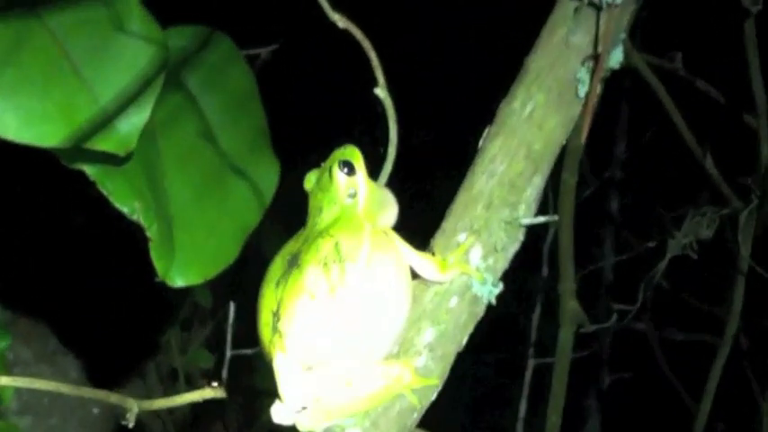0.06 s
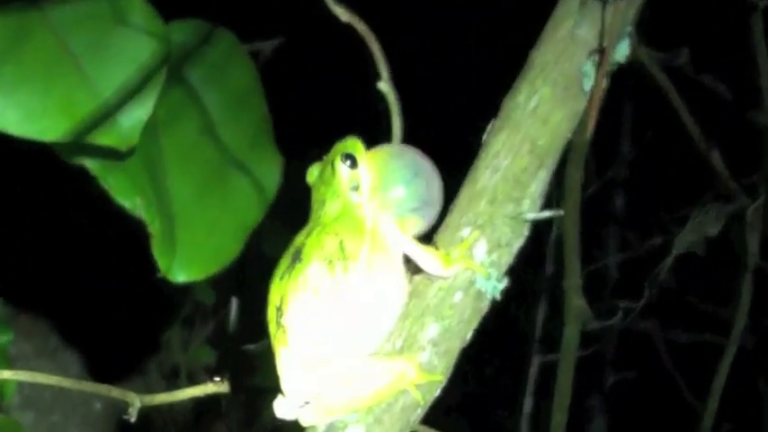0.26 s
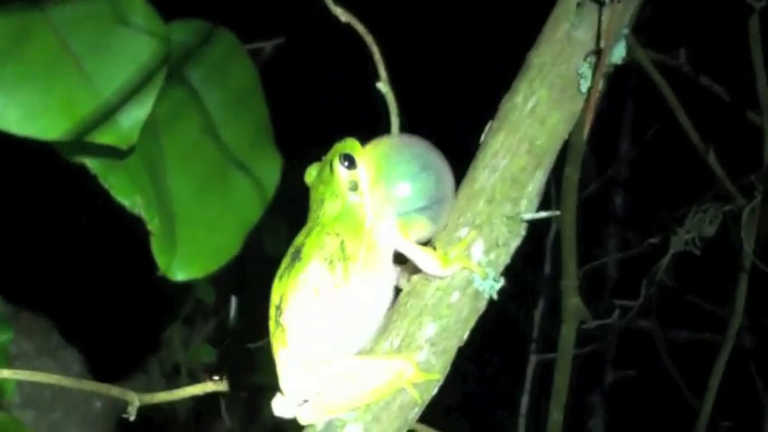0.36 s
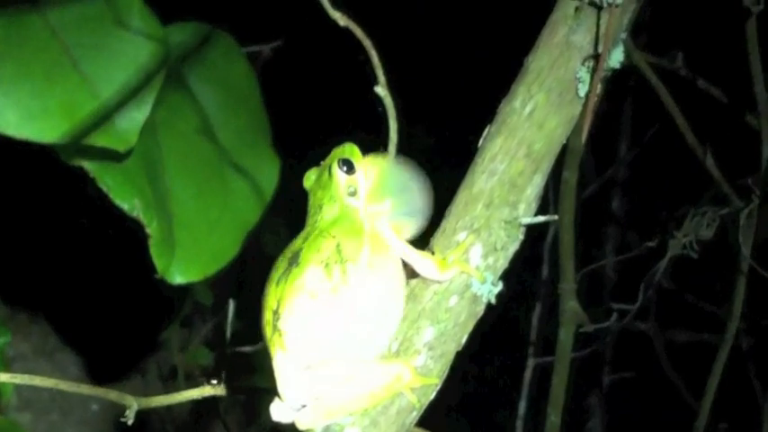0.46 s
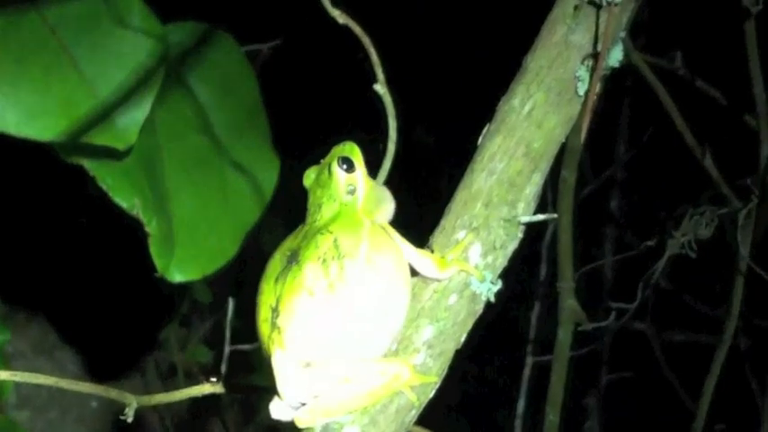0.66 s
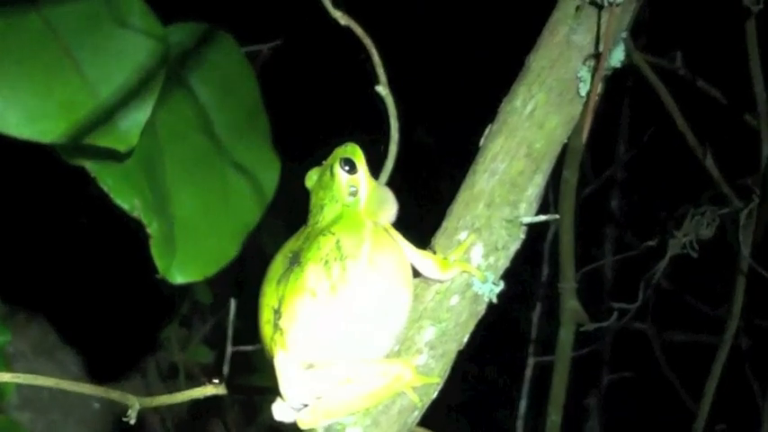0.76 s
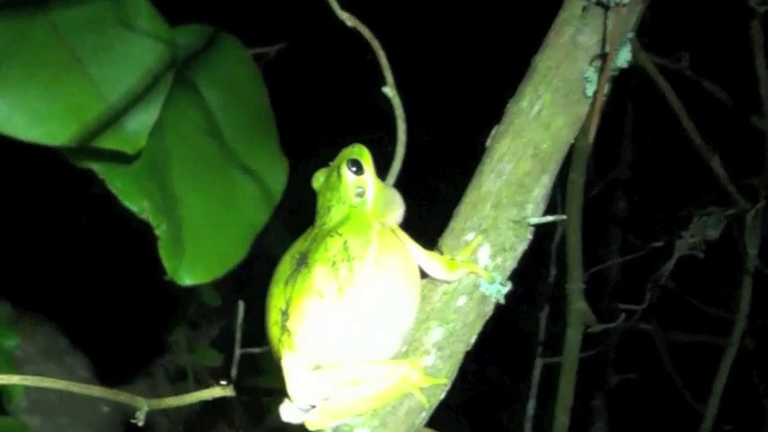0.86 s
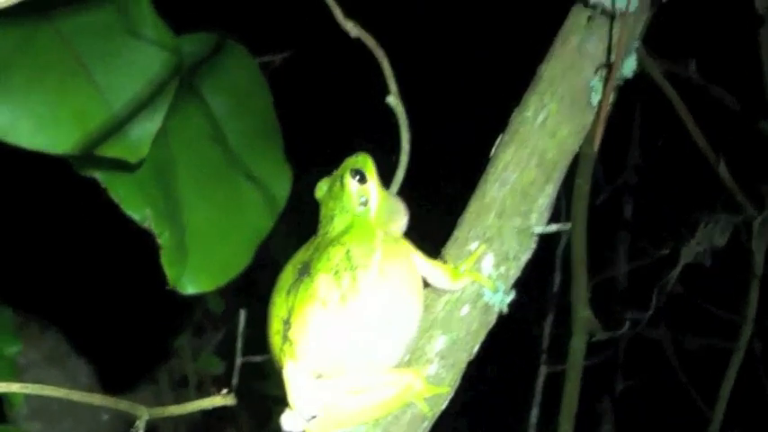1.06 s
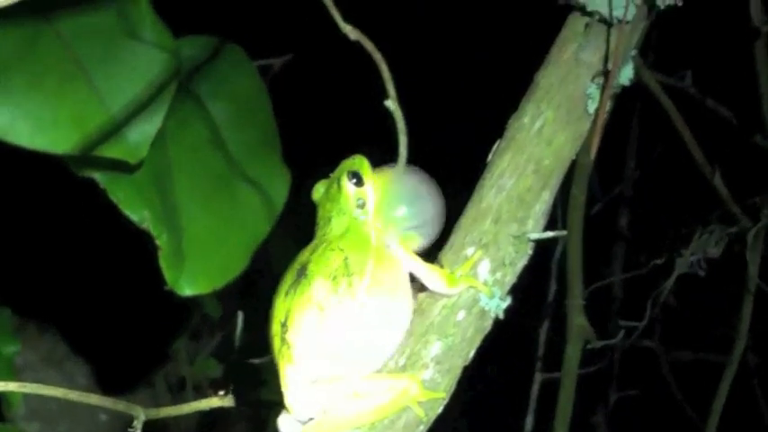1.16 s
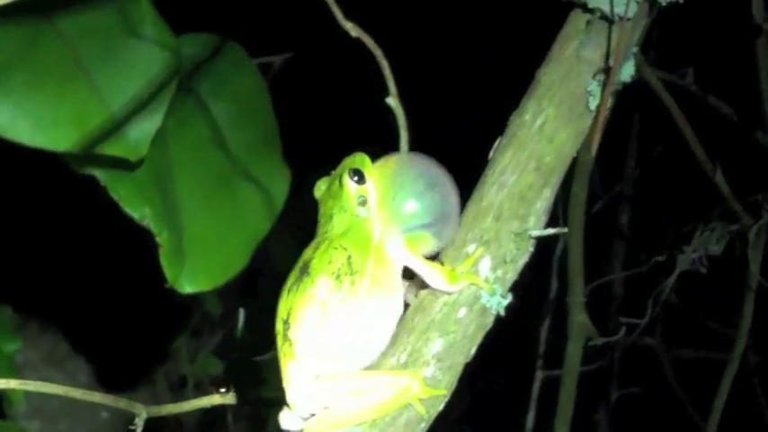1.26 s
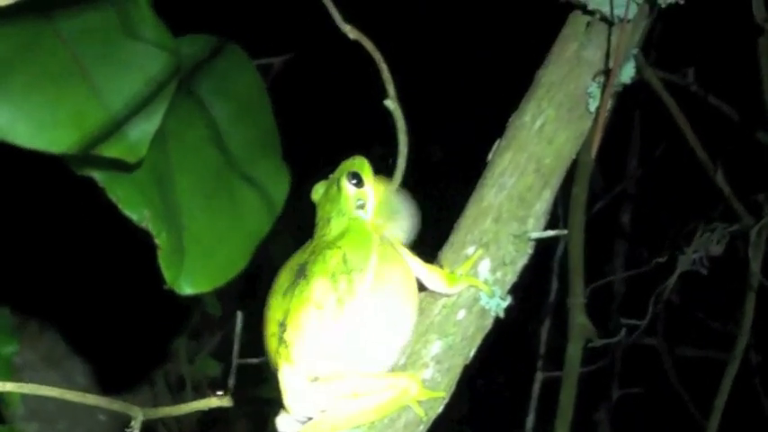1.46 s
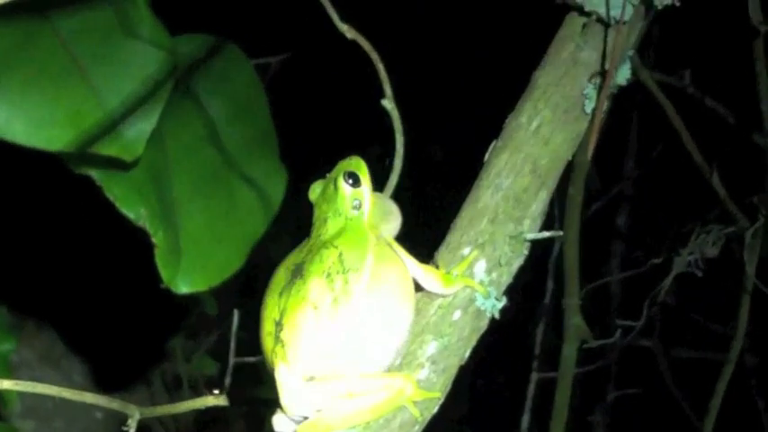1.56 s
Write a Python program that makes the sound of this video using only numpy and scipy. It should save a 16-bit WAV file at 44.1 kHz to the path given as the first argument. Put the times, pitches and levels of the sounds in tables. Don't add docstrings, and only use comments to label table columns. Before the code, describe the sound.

A tree frog gives two short, harsh, buzzing quacks close by over a distant night frog chorus

```python
import sys
import numpy as np
from scipy import signal
from scipy.io import wavfile
from scipy.ndimage import uniform_filter1d

SR = 44100
rng = np.random.default_rng(int(sys.argv[2]) if len(sys.argv) > 2 else 0)


def magnitude_from_level(level_db):
    exponent = np.asarray(level_db, float) / 20
    return 10 ** exponent


def digitize_waveform(pressure):
    field = np.atleast_2d(pressure).T
    bounded = np.clip(field, -1, 1)
    quanta = np.round(bounded * 32767).astype(np.int16)
    wavfile.write(sys.argv[1], SR, quanta)


N = 70560


def table(points, at):
    return np.interp(at, *np.transpose(points))


def evened(x):
    return x / np.sqrt(np.mean(x ** 2) + 1e-20)


def add(mix, start_s, sound):
    at = round(start_s * SR)
    part = mix[max(at, 0):][:max(len(sound) + min(at, 0), 0)]
    part += sound[max(-at, 0):][:len(part)]


def ring(x, hz, width_hz):
    turn = np.exp(2j * np.pi * np.cumsum(hz * np.ones(len(x))) / SR)
    r = np.exp(-np.pi * width_hz / SR)
    return 2 * (turn * signal.lfilter([1 - r], [1, -r], x / turn)).real


def soft_ring(x, hz, width_hz):
    return ring(ring(x, hz, width_hz), hz, 5.26 * width_hz)


def clicks(times, gains, size):
    at = np.floor(times * SR).astype(int)[:, None] + np.arange(-12, 13)
    u = at - times[:, None] * SR
    kernels = np.sinc(u) * np.cos(np.pi * u / 26) ** 2
    out = np.zeros(size)
    np.add.at(out, np.clip(at, 0, size - 1), gains[:, None] * kernels)
    return out


def noise(points, patchy_db):
    hz = np.fft.rfftfreq(512, 1 / SR)
    a, b, patch = rng.standard_normal((N // 128 + 6, 257, 3)).T
    patch = uniform_filter1d(patch, size=5, axis=0)
    patch = evened(uniform_filter1d(patch, size=12, axis=1))
    f, db = np.transpose(points)
    shape_db = np.interp(np.log(hz + 1), np.log(f + 1), db)
    z = (a + 1j * b) * magnitude_from_level(shape_db[:, None] + patchy_db * patch)
    return evened(signal.istft(z, nperseg=512, noverlap=384)[1][:N])


# pitch_hz, level_db (per Hz)
HUM_SPECTRUM = [(18, -92), (30, -23), (183, -5.5), (470, -5), (530, -6), (598, -2), (720, -1), (940, -18.5),
                (1580, -120)]


def self_noise():
    return magnitude_from_level(-66.5) * noise(HUM_SPECTRUM, patchy_db=2.)


def bushes(x):
    t60_s, treble_share = 0.24, 0.42
    t = np.arange(SR // 2) / SR
    taps = rng.standard_normal(len(t)) * (t > .004)
    low = uniform_filter1d(taps, size=5)
    tail = low * magnitude_from_level(-60 * t / t60_s)
    tail = tail + (taps - low) * magnitude_from_level(-60 * t / (t60_s * treble_share))
    return signal.fftconvolve(x, tail / np.linalg.norm(tail))[:N]


# call_share, level_db
EFFORT = [(0, -8), (.15, -4.5), (.35, -2.5), (.65, -3), (1, -8)]


def fold_pulses(length_s, hz, sag_hz, jitter_s, loose, catch):
    draws = rng.standard_normal((90, 2))
    k = np.arange(min(int(length_s * hz) + 1, 90))
    sag = 1 + sag_hz / hz * k / len(k) / 2
    unsteady = 1 + 30 * np.exp(-k / 2.5)
    times = k / hz * sag + jitter_s * unsteady * draws[k, 0]
    catch_s, lag_s = catch
    times = times + lag_s * (times > catch_s)
    shimmer_db = .15
    gains = magnitude_from_level(table(EFFORT, times / length_s) + shimmer_db * draws[k, 1])
    if len(loose):
        echo_s, echo_db = .0013, -1
        loose_s, loose_db = loose[:, 0], loose[:, 1] - 3
        times = np.r_[times, loose_s, loose_s + echo_s]
        gains = np.r_[gains, magnitude_from_level(loose_db), magnitude_from_level(loose_db + echo_db)]
    return times, gains


# pitch_hz, width_hz, level_db
BODY = [(925, 200, -8), (1230, 300, -18), (1550, 300, -23), (1830, 250, -20)]
# call_share, level_db
BODY_WEIGHT = [(-.15, 9.5), (0, 5.5), (.2, 0), (.6, -1.5), (.8, -2), (1, -0.5)]


def body(pulses, share, scale, low_db):
    out = sum(magnitude_from_level(db + low_db * (f < 1100)) * soft_ring(pulses, f * scale, w) for f, w, db in BODY)
    return out * magnitude_from_level(table(BODY_WEIGHT, share))


# pitch_hz, width_hz, level_db
SAC = [(3050, 247, 1), (3333, 300, -21.5)]
SWELL = [(-.1, 0.83), (.05, 0.88), (.2, 0.965), (.6, 1.0276), (1.1, 1.049)]
# pitch_hz, width_hz, level_db
WALL = (2440, 110, -12.5)
# call_share, level_db
SLACK = [(-.1, 3), (.05, 9), (.2, -1), (.6, 2), (1, -2)]


def sac(pulses, share, scale, slack):
    tuning = scale * table(SWELL, share)
    out = sum(magnitude_from_level(db) * soft_ring(pulses, f * tuning, w) for f, w, db in SAC)
    wall_hz, width_hz, wall_db = WALL
    wall = soft_ring(pulses, wall_hz * scale, width_hz)
    return out + magnitude_from_level(wall_db + slack * table(SLACK, share)) * wall


# pitch_hz, width_hz, level_db
THROAT = [(4340, 590, -26), (4550, 380, -17), (5454, 656, -19.5), (5900, 595, -15.5), (6974, 650, -24),
          (8035, 307, -15.5), (8150, 230, -32.5), (9300, 540, -43)]
# call_share, level_db
BRIGHT = [(-.1, -17), (0, -18), (.15, -4), (.35, -7), (.7, -1), (1, -4)]


def throat(pulses, share, bright_db):
    arch = 1 - 0.072 * (2 * np.clip(share, 0, 1) - 1) ** 2
    out = 0
    for j, (f, w, db) in enumerate(THROAT):
        out = out - (-1) ** j * magnitude_from_level(db) * soft_ring(pulses, f * arch, w)
    return out * magnitude_from_level(bright_db + table(BRIGHT, share))


LEAD_S, TRAIL_S = .03, .06


def voice(length_s, hz, sag_hz, jitter_s, low_db=0., bright_db=0., loose=(), catch=(0, 0)):
    times, gains = fold_pulses(length_s, hz, sag_hz, jitter_s, loose, catch)
    size = round((LEAD_S + length_s + TRAIL_S) * SR)
    share = (np.arange(size) / SR - LEAD_S) / length_s
    pulses = clicks(times + LEAD_S, gains, size) * np.sqrt(SR / hz / 2) * np.sqrt(SR / hz)
    scale = hz / 304
    out = body(pulses, share, scale, low_db)
    out = out + sac(pulses, share, scale, slack=len(loose) > 0)
    return out + throat(pulses, share, bright_db)


# pitch_hz, level_db (per Hz)
WASH_SPECTRUM = [(470, -48.5), (800, -4.5), (857, -4), (1180, 1.5), (1340, -11.5), (1970, 3.5), (3170, 0.5),
                 (5740, -14.5), (8530, -50), (11100, -49.5), (18800, -120)]
# start_s, level_db
CHORUS_SWELL = [(0, 8), (.12, 2.5), (.19, 2), (.44, 2.5), (.53, 2), (.63, 3), (.76, 4.5), (.85, 3),
                (1.08, 6), (1.35, 2.5), (1.49, 0.5), (1.6, 6.5)]


def chorus():
    count = 36
    out = np.zeros(N)
    for j, (a, b, c) in enumerate(rng.random((count, 3))):
        start_s = (j + a) / count * (N / SR + .2) - .2
        call = voice(.14, 292 + 40 * b, 8.2, .00002, low_db=-1.5, bright_db=13.5)
        add(out, start_s, magnitude_from_level(-5 * c) * call)
    far = magnitude_from_level(-41) * evened(.5 * out + bushes(out))
    far = far + magnitude_from_level(-44.5) * noise(WASH_SPECTRUM, patchy_db=1.)
    return far * magnitude_from_level(table(CHORUS_SWELL, np.arange(N) / SR))


# start_s, length_s, pulse_rate_hz, level_db, low_body_db
NEIGHBOURS = [
    (0.058, 0.1, 298.3, -35.5, 5),
    (.30, 0.098, 301.9, -30.5, 5),
    (0.462, 0.11, 323.7, -37, -17),
    (0.574, 0.076, 294, -52, 9.5),
    (0.673, 0.13, 297.7, -35, 3),
    (0.877, 0.13, 326.1, -34.5, -6),
    (0.95, .16, 305.5, -33.5, 8),
    (1.032, 0.053, 327.2, -33.5, -15),
    (1.332, 0.1, 299.7, -32.5, 2.5),
    (1.521, 0.16, 328.8, -32.5, -7.5),
]
# start_s, pitch_hz, level_db, length_s,
# glide_hz
CHIRPS = [
    (0.97, 3050, -29, 0.0086, 4),
    (1.036, 3204, -31, 0.0093, 4),
    (1.043, 3110, -28, .008, 5),
    (1.056, 3210, -35, 0.0091, -5),
    (0.053, 1823, -42, 0.09, 203),
    (1.525, 1950, -43, 0.058, 89),
]


def neighbours():
    out = np.zeros(N)
    for start_s, length_s, hz, db, low_db in NEIGHBOURS:
        bright_db = -0.5 + 1.2 * (db + 36)
        call = voice(length_s, hz, 12, .000006, low_db, bright_db)
        add(out, start_s - LEAD_S, magnitude_from_level(db) * call)
    for start_s, hz, db, length_s, glide_hz in CHIRPS:
        t = np.arange(0, length_s, 1 / SR)
        swell = np.sqrt(2 * np.sin(np.pi * t / length_s))
        tone = np.sin(2 * np.pi * (hz + glide_hz * t / length_s / 2) * t)
        add(out, start_s, magnitude_from_level(db) * swell * tone)
    return out + magnitude_from_level(-10) * bushes(out)


# first_steady_pulse_s, last_steady_pulse_s, pulse_rate_hz
NEAR_CALLS = [
    (.2219, .3615, 304.2),
    (1.1635, 1.2988, 304.2),
]
NEAR_DB = [-13.5, -13]
# start_s, level_db
SPUTTER = [(.2012, -35), (.2086, -26), (.2173, -21), (.3662, -19), (.3724, -23), (.3812, -29),
           (1.1415, -32), (1.1488, -27), (1.1577, -20), (1.3030, -19), (1.3084, -22), (1.3170, -28)]
# delay_s, level_db
LEAF_ECHOES = [(.0012, -45.5), (.0024, -34.5), (.0053, -23)]


def near_frog():
    catch_s, lag_s = .2340, .00075
    out, loose = np.zeros(N), np.array(SPUTTER)
    for (first, last, hz), db in zip(NEAR_CALLS, NEAR_DB):
        nearby = abs(loose[:, 0] - (first + last) / 2) < .2
        mine = loose[nearby] - [first, db]
        catch = (catch_s - first, lag_s * (catch_s > first))
        call = voice(last - first, hz, sag_hz=.8, jitter_s=.000004, loose=mine, catch=catch)
        add(out, first - LEAD_S, magnitude_from_level(db) * call)
    echo = out.copy()
    for delay_s, db in LEAF_ECHOES:
        add(echo, delay_s, magnitude_from_level(db) * out)
    return echo + magnitude_from_level(-25) * bushes(out)


def scene():
    air = signal.butter(4, 6900, fs=SR, output="sos")
    far = signal.sosfilt(air, neighbours() + chorus())
    return (near_frog() + far)[None]


def roll_off(x):
    return signal.sosfilt(signal.butter(12, 15000, fs=SR, output="sos"), x)


def record(dry):
    low_cut = signal.ellip(6, .5, 36, 821, "high", fs=SR, output="sos")
    top_cut = signal.butter(6, 8800, fs=SR, output="sos")
    heard = signal.sosfilt(top_cut, signal.sosfilt(low_cut, dry))
    return roll_off(heard + self_noise())


dry = scene()
out = record(dry)
digitize_waveform(out)
```